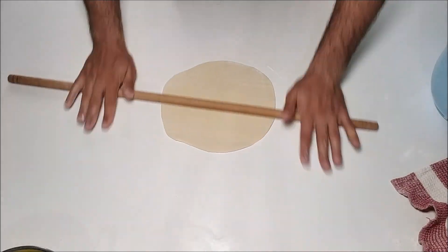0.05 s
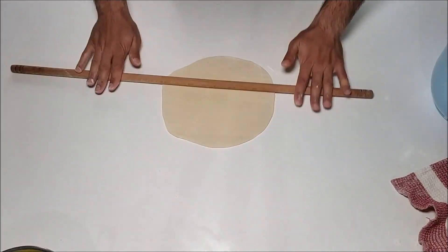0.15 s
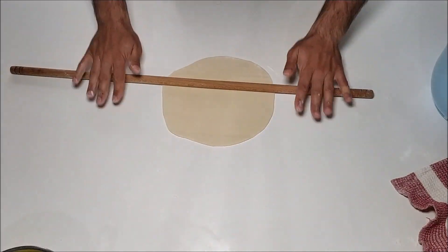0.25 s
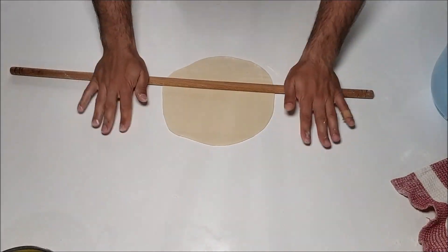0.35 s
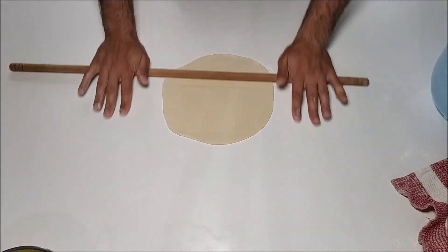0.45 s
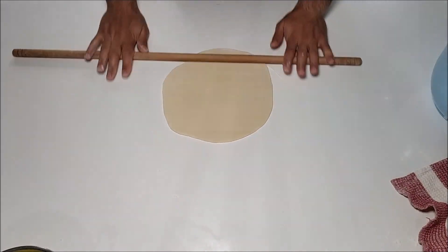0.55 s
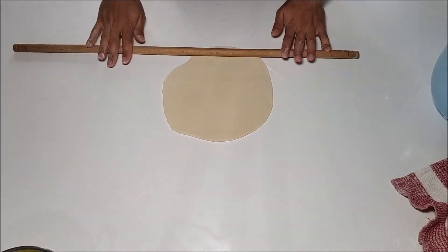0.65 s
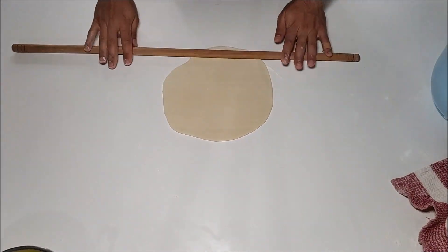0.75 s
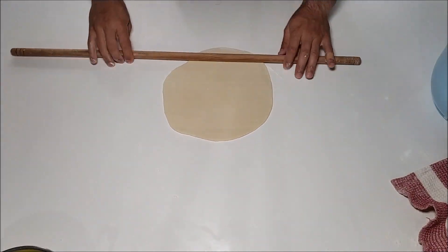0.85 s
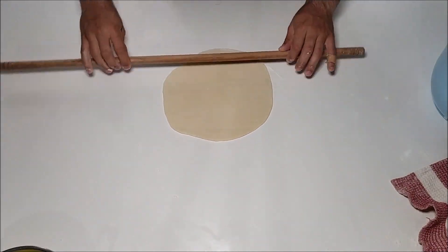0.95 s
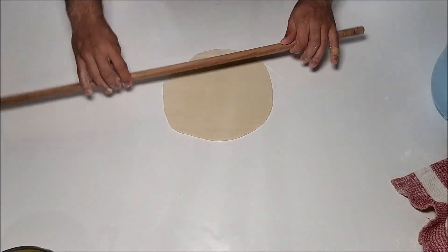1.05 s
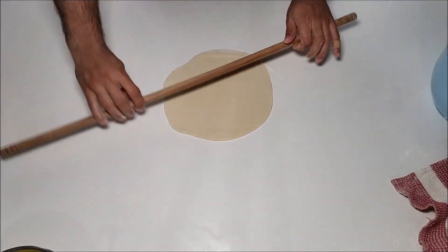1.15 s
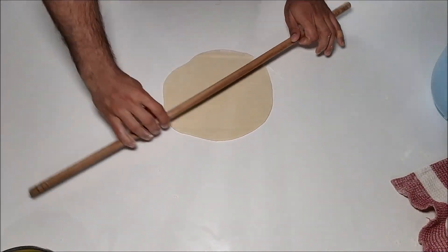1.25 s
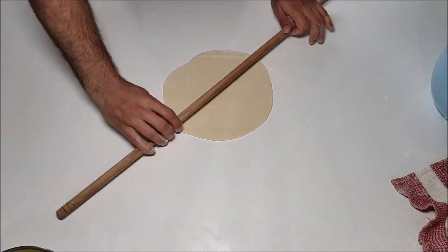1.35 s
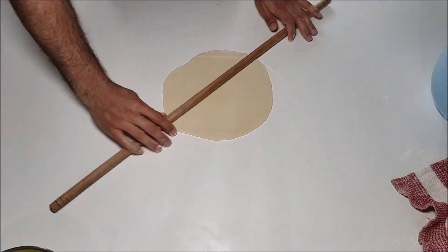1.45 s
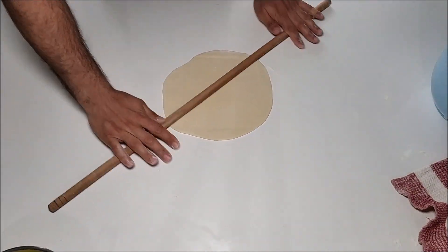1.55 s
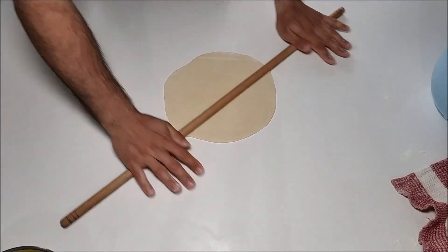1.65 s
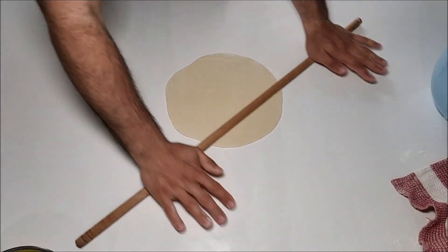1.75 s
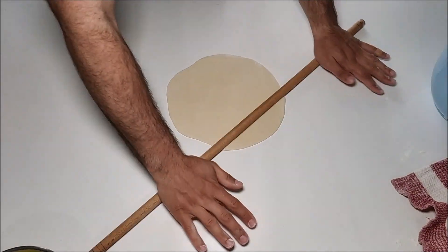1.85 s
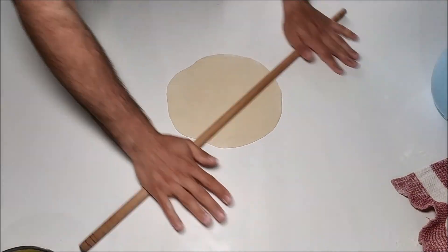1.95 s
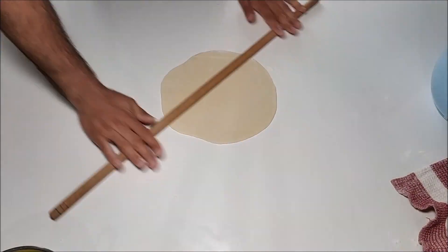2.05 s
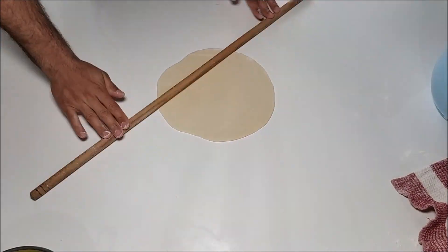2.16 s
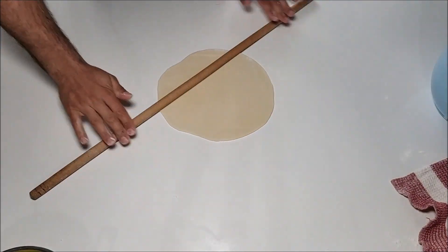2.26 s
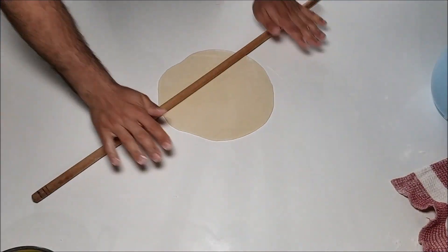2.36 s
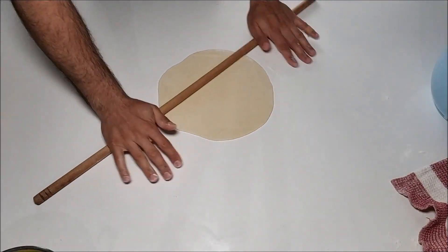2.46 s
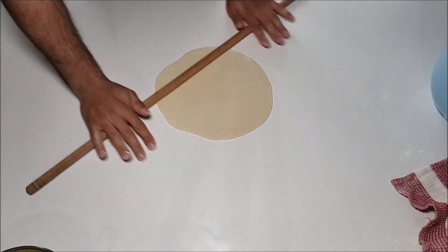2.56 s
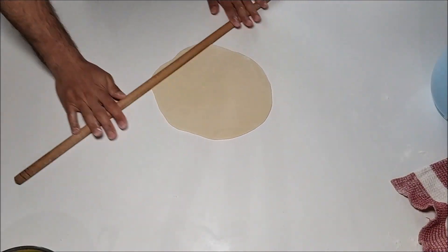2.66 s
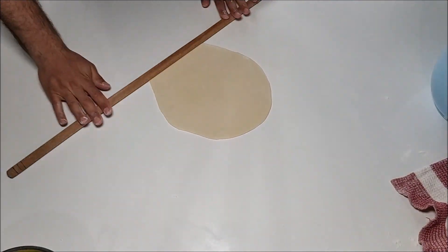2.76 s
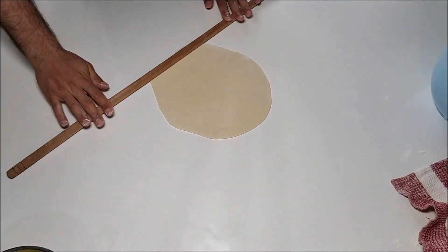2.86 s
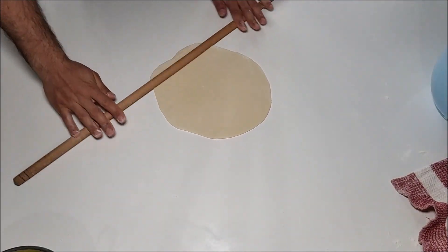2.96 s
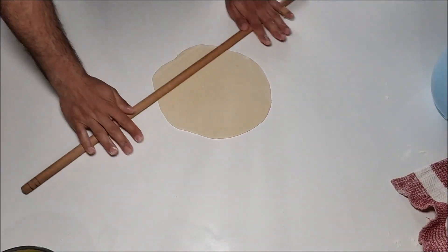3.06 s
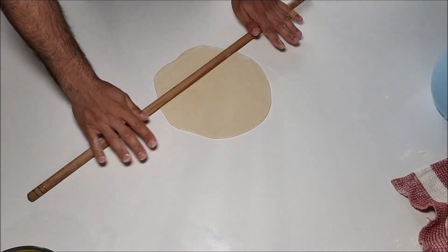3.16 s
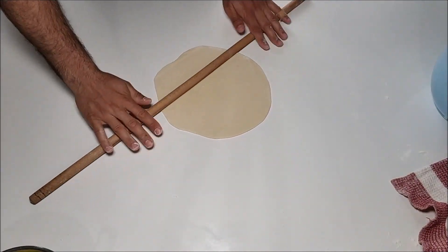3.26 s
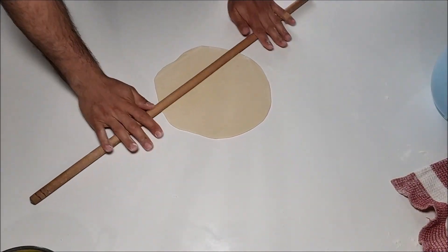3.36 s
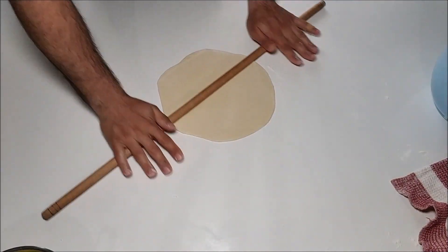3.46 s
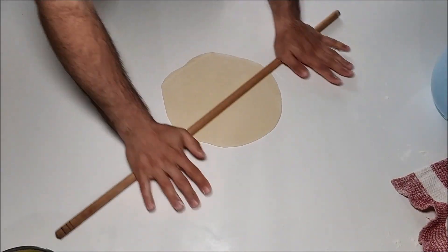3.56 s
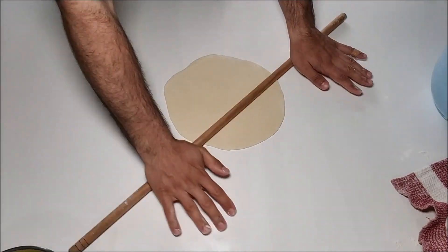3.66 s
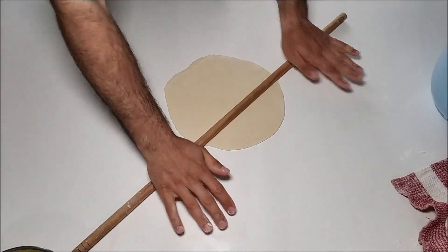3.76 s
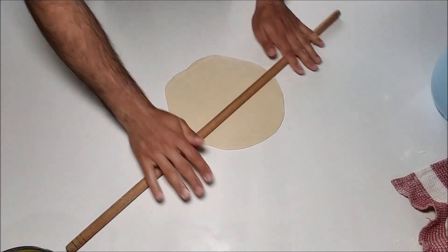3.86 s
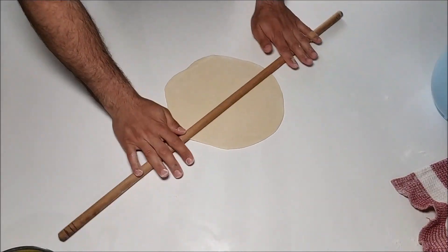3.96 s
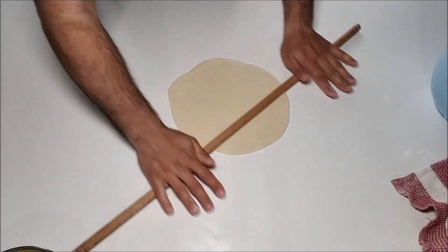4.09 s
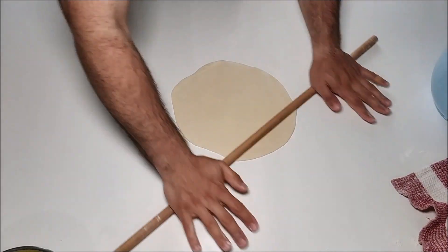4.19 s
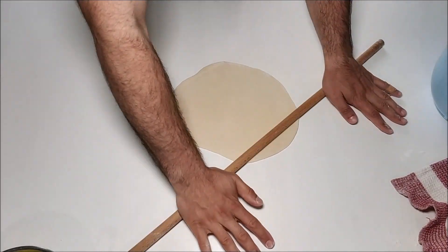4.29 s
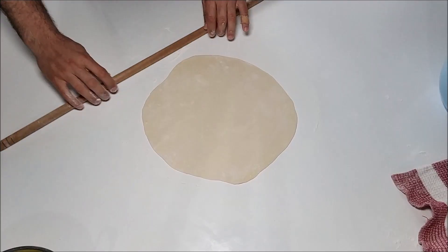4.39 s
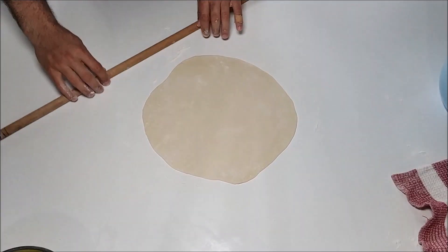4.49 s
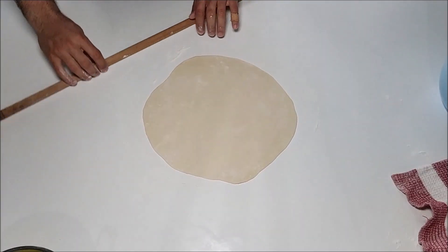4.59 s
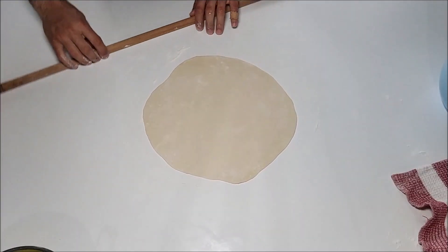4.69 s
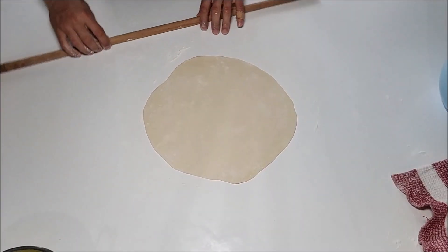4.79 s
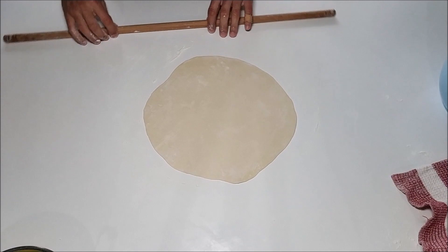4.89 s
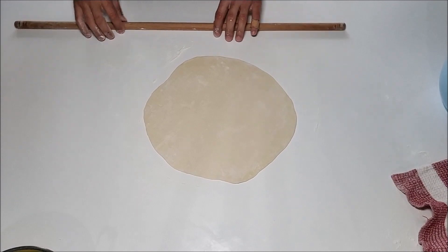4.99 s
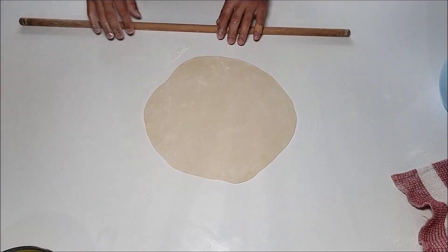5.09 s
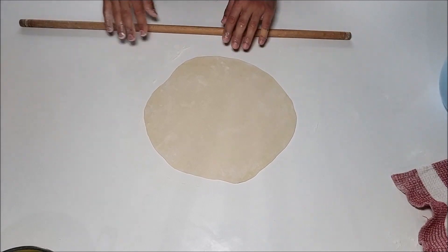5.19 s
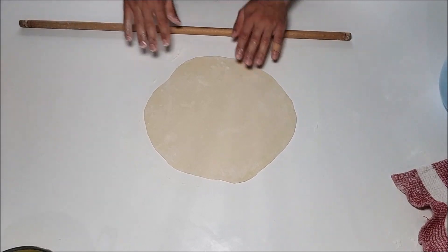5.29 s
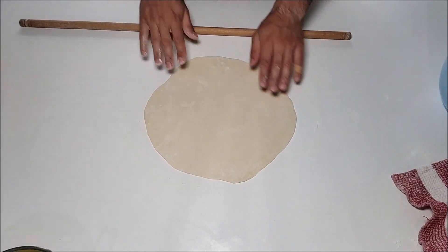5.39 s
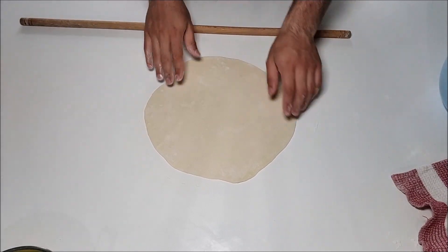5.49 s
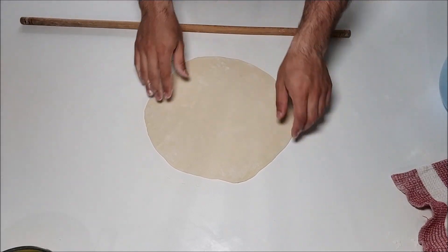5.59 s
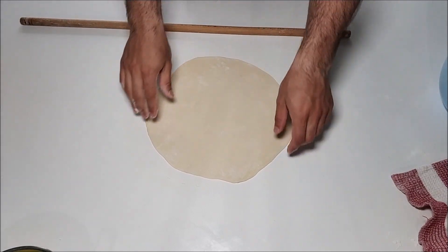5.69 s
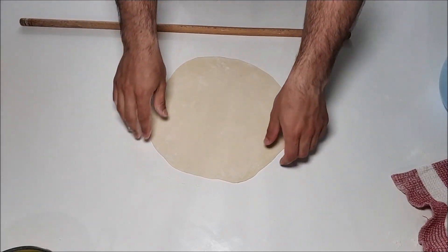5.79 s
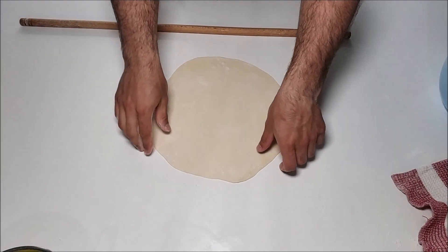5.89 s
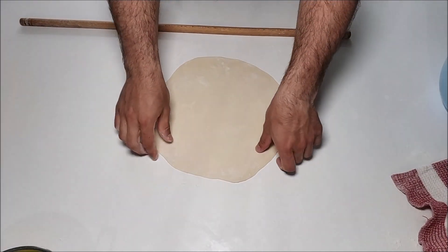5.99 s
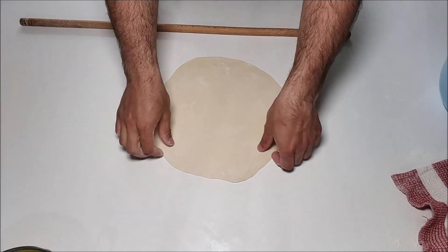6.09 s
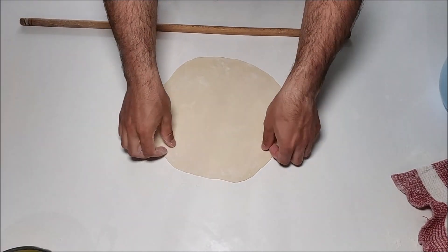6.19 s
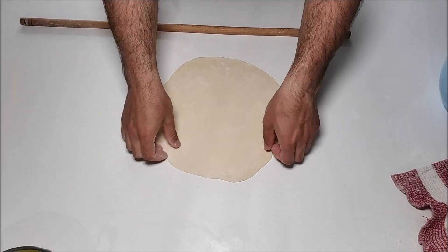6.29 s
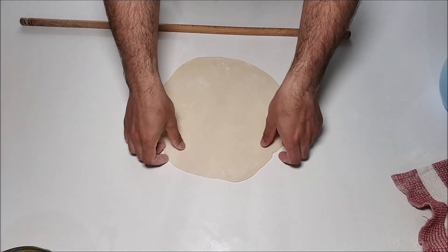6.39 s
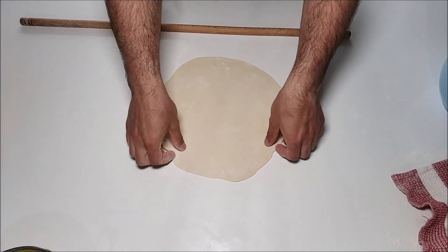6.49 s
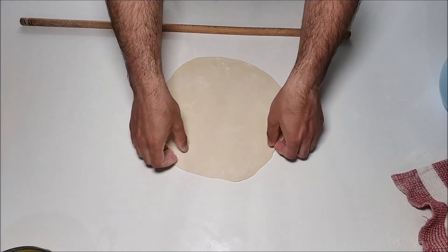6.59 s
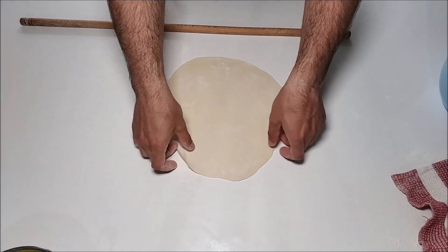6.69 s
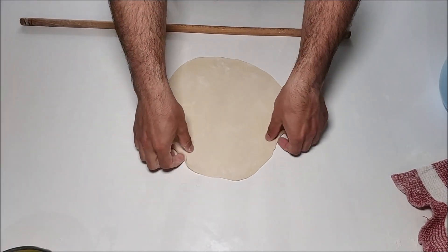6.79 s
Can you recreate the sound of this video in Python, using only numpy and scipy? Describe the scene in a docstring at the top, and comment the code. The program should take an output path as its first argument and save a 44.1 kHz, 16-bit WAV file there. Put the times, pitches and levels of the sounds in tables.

```python
"""A long thin wooden rolling pin rumbles back and forth over dough on a stone counter in a bare kitchen.
Flour crunches under it, palms hiss along the wood, and its ends clack on the counter as it tips off
the dough. Then it is laid aside and the hands ease the dough round with soft thuds and skids,
over a low appliance hum and a faint, wavering distant tone."""
import sys
import numpy as np
from scipy import signal
from scipy.fft import rfft, irfft
from scipy.io import wavfile

SR = 44100
rng = np.random.default_rng(int(sys.argv[2]) if len(sys.argv) > 2 else 0)


def unload_wav(signal):
    """Save mono or channel-first audio to the path in sys.argv[1] as 16-bit WAV at rate SR, clipped to [-1, 1]."""
    wavfile.write(
        sys.argv[1],
        SR,
        np.round(np.clip(np.atleast_2d(signal).T, -1, 1) * 32767).astype(np.int16),
    )


N = 301644

# Pushes and pulls: t/s, length/s, speed peak/fraction of length, rumble/dB, grit/dB, hiss/dB
PIN_STROKES = [(0.03, 0.33, 0.37, -42.5, -49.5, -54), (0.471, .16, 0.32, -72, -64, -58.5),
               (0.57, .23, 0.24, -44, -51, -54.5), (0.866, 1, 0.67, -61, -58.5, -69),
               (1.49, 0.47, 0.78, -50.5, -54, -59), (2.002, 0.37, 0.39, -42.5, -45, -53),
               (2.56, .3, 0.44, -49.5, -58, -55.5), (2.969, 0.29, .25, -55.5, -70.5, -64),
               (3.44, 0.41, 0.31, -50.5, -53, -55), (4.024, 0.38, 0.48, -49.5, -51.5, -55),
               (4.583, 0.33, 0.6, -57.5, -57.5, -60), (4.888, 0.22, 0.27, -52.5, -58, -60.5)]
def stroke_gains():
    """Rumble, grit and hiss each grow as a power of the pin's speed."""
    exponents = (1.37, 1.3, 0.3)
    gains = np.zeros((3, N))
    for start_s, length_s, peak, *levels_db in PIN_STROKES:
        for gain, db, exponent in zip(gains, levels_db, exponents):
            add(gain, start_s, amp(db) * hand_speed(length_s, peak) ** exponent)
    return gains


# Rumble spectrum: f/Hz, density/dB
RUMBLE_DB = [(50, -48), (90, -38), (130, -2.5), (200, -1), (290, -1.5), (380, 0.5), (480, -13), (800, -12),
             (2000, -26.5), (5000, -28.5), (8000, -61)]
# Flour crunch spectrum: f/Hz, density/dB
GRIT_DB = [(300, -25.5), (600, -3.5), (900, -4.5), (1600, -1.5), (2300, -6), (3500, -5.5), (6000, -11.5),
           (11000, -33.5)]
def rolling(rumble_gain, grit_gain):
    """Flats in the wood bump the counter as the pin turns; flour crunches under it."""
    turning = amp(1.5 * narrow_noise(30, width_hz=15))
    bumps = unit(colour(grains(1500, spread_db=1.9) * turning, RUMBLE_DB))
    rumble = kitchen(rumble_gain * bumps, wet_db=1, early_db=-22)
    crunch = unit(colour(grains(1500, spread_db=1.4) * turning, GRIT_DB))
    grit = kitchen(grit_gain * crunch, wet_db=3, early_db=-4.5)
    return amp(-6.5) * rumble + amp(-7.5) * grit


# Pin hits on the counter: t/s, level/dB, contact cut-off/Hz, thud/dB, crack/dB, ring/dB,
# low mode/Hz, high mode/Hz
PIN_HITS = [(0.892, -24.5, 4770, -17.5, -3.5, -1, 1122, 3040),
            (0.901, -29, 3600, -13.5, -21, 8, 1530, 3061), (1.473, -17, 5200, -15, -2, 5.5, 1800, 2490),
            (1.526, -19.5, 5360, -11.5, -1.5, 3, 1633, 3053), (1.538, -23, 4560, -24, -11, -19, 1480, 3900),
            (2.1451, -24.5, 3480, -12.5, 2, -5, 825, 2180), (2.527, -20.5, 4600, -10, 2, -3, 1938, 3390),
            (2.563, -26, 3000, -15, -12, -12, 788, 1936), (3.380, -21, 8300, -8, 8.5, -1.5, 2100, 5040),
            (3.390, -19, 5200, -14.5, 5.5, -3.5, 1890, 2270), (3.68, -38.5, 1690, -10, -16, -6, 1737, 1920),
            (3.9699, -21, 8050, -13.5, 8, 8.5, 3270, 3530),
            (3.983, -21, 2400, -30.5, -20.5, -8.5, 1580, 1970),
            (4.405, -22, 2230, -5.5, -14, -6, 354, 1584), (4.419, -22.5, 3600, -13, -1.5, -6.5, 2320, 3930),
            (4.444, -31, 2010, -6.5, -16, 11, 330, 1800), (4.598, -55.5, 1500, 14.5, -18, 18, 344, 1120)]
def knocks():
    """The pin's ends strike the counter."""
    out = np.zeros(N)
    for start_s, *blow in PIN_HITS:
        add(out, start_s, knock(*blow))
    return out


# Wood-on-stone clatter spectrum: f/Hz, density/dB
CLATTER_DB = [(100, -18), (300, -8), (580, -33), (800, -2), (1000, -6), (1700, 4.5), (3500, 0), (5000, -1),
              (7000, -4.5), (9300, 4.5), (11000, -32.5)]
# Counter thud spectrum: f/Hz, density/dB
THUD_DB = [(40, -22), (90, -46), (140, -3), (220, 2), (330, 2.5), (400, 2), (550, -5), (1200, -17),
           (5000, -63)]
# First-contact spectrum: f/Hz, density/dB
CRACK_DB = [(200, -25), (1000, -14.5), (2500, -2.5), (4000, 3), (7000, -7.5), (9300, -5.5), (11000, -11.5)]
def knock(db, contact_hz, thud_db, crack_db, ring_db, low_hz, high_hz):
    """One blow: crack, ring and clatter, dulled by a soft contact, over the counter's thud."""
    t = np.arange(SR * 3 // 4) / SR
    contact = signal.butter(2, contact_hz, fs=SR)
    clatter = amp(1) * burst(t, 0.03, CLATTER_DB)
    ring = amp(ring_db) * pin_ring(t, low_hz, high_hz)
    wood = one_blow(signal.lfilter(*contact, ring + clatter))
    thud = amp(thud_db) * burst(t, 0.057, THUD_DB)
    body = kitchen(wood + thud, wet_db=3)
    touch = one_blow(colour(signal.unit_impulse(len(t)), CRACK_DB))
    chatter = amp(-4) * burst(t, 0.0056, CRACK_DB)
    crack = one_blow(signal.lfilter(*contact, touch + chatter))
    crack = kitchen(crack, wet_db=-1.5, early_db=-32)
    return amp(db - 12) * (body + amp(crack_db - 2.5) * crack)


# Hand-damped pin modes: f/Hz, level/dB, t60/s
PIN_MODES = [(400, -16.5, 0.11), (694.7, -13.5, 0.16), (817, -10, 0.085), (1060, -3.5, 0.068),
             (1140, -12, 0.35), (1485, -7.5, 0.21), (1620, -10.5, 0.14), (1800, -32, 0.091),
             (1890, -3, 0.13), (2010, -15, 0.11), (2320, -4, 0.12), (2527, 2.5, 0.048), (2714, -6, 0.22),
             (3013, 8, 0.027), (3000, 2, 0.027), (3530, -7, 0.11), (3588, 8.5, 0.052), (3940, -6, 0.086),
             (4430, 4, 0.021), (4260, -12.5, 0.12), (4643, -26.5, .06), (4873, -3.5, 0.12),
             (5200, 1.5, .05)]
def pin_ring(t, low_hz, high_hz):
    """The landing spot weights the pin's modes and favours two more; the grip detunes them slightly."""
    favoured_db, favoured_t60_s, spread_db = 6, 0.075, 2
    modes = [*PIN_MODES, (low_hz, favoured_db, favoured_t60_s), (high_hz, favoured_db, favoured_t60_s)]
    hz, db, t60_s = np.transpose(modes)[:, :, None]
    weight, grip, phase = rng.standard_normal((3, len(modes), 1))
    waves = np.sin(2 * np.pi * (hz * (1 + 0.003 * grip) * t + phase))
    decays = amp(db + spread_db * weight - 60 * t / t60_s)
    return one_blow((decays * waves).sum(0))


# Palm skids: t/s, length/s, level/dB
PALM_SKIDS = [(0.1, .07, -52), (0.635, 0.079, -42), (0.959, 0.075, -54), (1.071, .085, -51.5),
              (1.182, 0.051, -59.5), (1.846, 0.051, -51), (2.594, 0.18, -38), (2.747, 0.066, -45),
              (3.127, 0.09, -55.5), (4.586, 0.12, -55), (4.78, 0.11, -55.5), (5.67, 0.18, -67),
              (6.058, 0.45, -70), (6.55, 0.14, -68)]
# Skin friction spectrum: f/Hz, density/dB
RUB_DB = [(400, -25), (1200, -16.5), (2500, -11.5), (4500, -8.5), (6000, -8.5), (7500, -7.5), (8900, 3.5),
          (9600, 1), (11000, -19)]
def rubbing(hiss_gain):
    """Skin slips over floury wood and dough in tiny catches; each skid adds a short swell."""
    skid_gain = np.zeros(N)
    for start_s, length_s, db in PALM_SKIDS:
        add(skid_gain, start_s, amp(db) * hand_speed(length_s, peak=0.54) ** 0.68)
    slips = grains(9000, spread_db=2) * amp(0.7 * narrow_noise(40, width_hz=30))
    hiss = np.hypot(hiss_gain, skid_gain) * unit(colour(slips, RUB_DB))
    return amp(-4.5) * kitchen(hiss, wet_db=2, early_db=-1.5)


# Soft thuds on dough and counter: t/s, level/dB
SOFT_THUDS = [(1.36, -58), (2.045, -45.5), (5.215, -54), (5.256, -59), (5.599, -55), (5.823, -54),
              (6.141, -62), (6.395, -51.5), (6.629, -58.5), (6.775, -50.5)]
def soft_thuds():
    """The hands or a light bump of the pin wake only the counter's low thud."""
    attack_s, t60_s = 0.008, 0.1
    t = np.arange(SR // 2) / SR
    out = np.zeros(N)
    for start_s, db in SOFT_THUDS:
        thud = burst(t, t60_s, THUD_DB) * (1 - np.exp(-t / attack_s))
        add(out, start_s, amp(db - 7.5) * one_blow(thud))
    return kitchen(out, wet_db=-4)


# Air noise spectrum: f/Hz, density/dB
AIR_DB = [(18, -89), (30, -36.5), (65, -53.5), (103, -39), (117, -31), (132, -5.5), (169, -11.5),
          (206, -1.5), (355, -10.5), (501, -9), (907, -16), (1080, -11.5), (7230, -24), (9250, -20),
          (11000, -39), (14300, -65), (22000, -120)]
# Low appliance hum, then distant tone: f/Hz, width/Hz, level/dB
TONE_BANDS = [(215.8, 7.2, -11.5), (569, 67, -19.5)]
# Room tone envelope: t/s, level/dB
ROOM_TONE_DB = [(0, -55.5), (.85, -60), (1.45, -65.5), (2.5, -61), (3.9, -62), (5.1, -56.5), (6.84, -55)]
def room_tone():
    """Air noise, a low appliance hum and a faint, wavering distant tone; the level dips mid-scene."""
    air = amp(-4) * unit(colour(rng.standard_normal(N), AIR_DB))
    tones = sum(amp(db) * narrow_noise(hz, width_hz) for hz, width_hz, db in TONE_BANDS)
    level_db = np.interp(np.arange(N) / SR, *np.transpose(ROOM_TONE_DB))
    return amp(level_db) * (air + tones)


# Room decay: f/Hz, t60/s
ROOM_T60_S = [(150, 0.6), (400, 0.44), (1000, 0.39), (2800, 0.4), (5000, 0.31), (9000, 0.26)]
def kitchen(x, wet_db, early_db=-9, build_s=0.0018):
    """Adds four reflections off nearby surfaces and an echo that dies band by band."""
    t = np.arange(SR * 3 // 4) / SR
    scatter = grains(5000, spread_db=1.8)[:len(t)]
    hz, frame_s, bands = signal.stft(scatter, SR, nperseg=256)
    decay = amp(-60 * frame_s / at_hz(ROOM_T60_S, hz)[:, None])
    tail = signal.istft(bands * decay, SR, nperseg=256)[1][:len(t)]
    tail *= 1 - np.exp(-t / build_s)
    echo = amp(wet_db) * tail / np.linalg.norm(tail)
    echo[rng.integers(40, 260, 4)] += amp(early_db)
    return x + signal.fftconvolve(x, echo)[:len(x)]


def hand_speed(length_s, peak):
    """Even acceleration from rest, then even braking."""
    progress = np.arange(0, length_s, 1 / SR) / length_s
    return np.interp(progress, [0, peak, 1], [0, 1, 0])


def grains(per_s, spread_db):
    """Random tiny impacts of uneven size, rms 1."""
    size = amp(spread_db * np.minimum(rng.exponential(1, N), 4))
    return unit(size * rng.standard_normal(N) * (rng.random(N) < per_s / SR))


def burst(t, t60_s, spectrum):
    """Dense, dying rattle."""
    return one_blow(colour(rng.standard_normal(len(t)) * amp(-60 * t / t60_s), spectrum))


def narrow_noise(hz, width_hz):
    """Noise band around hz, rms 1."""
    offset_hz = np.fft.rfftfreq(N, 1 / SR) - hz
    band = rfft(rng.standard_normal(N)) / (1 + (2 * offset_hz / width_hz) ** 2)
    return unit(irfft(band, N))


def colour(x, spectrum, size=4096):
    """Minimum-phase filter with the given spectrum."""
    hz = abs(np.fft.fftfreq(size, 1 / SR))
    log_gain = np.log(amp(at_hz(spectrum, hz)))
    taps = np.fft.ifft(np.exp(np.conj(signal.hilbert(log_gain)))).real
    return signal.oaconvolve(x, taps[:size // 2])[:len(x)]


def at_hz(table, hz):
    """Table lookup on a log-frequency axis."""
    table_hz, values = np.transpose(table)
    return np.interp(np.log(hz + 1), np.log(table_hz + 1), values)


def amp(db):
    """Decibels to gain."""
    return 10 ** (np.asarray(db) / 20)


def unit(x):
    """Scales to rms 1."""
    return x / np.sqrt(np.mean(x ** 2) + 1e-20)


def one_blow(x):
    """Scales to the energy of 20 ms at rms 1."""
    return x / np.linalg.norm(x) * np.sqrt(SR / 50)


def add(mix, start_s, sound):
    """Mixes a sound in at start_s."""
    part = mix[round(start_s * SR):][:len(sound)]
    part += sound[:len(part)]


def scene():
    """All sources at one microphone above the counter."""
    rumble_gain, grit_gain, hiss_gain = stroke_gains()
    mix = knocks() + rolling(rumble_gain, grit_gain) + rubbing(hiss_gain) + soft_thuds() + room_tone()
    return mix[None]


def record(dry, low_cut_hz=105, band_limit_hz=10550):
    """Microphone bass cut, then band limit."""
    highpass = signal.butter(3, low_cut_hz, "high", fs=SR, output="sos")
    lowpass = signal.firwin(101, band_limit_hz, window=("kaiser", 7), fs=SR)
    return signal.oaconvolve(signal.sosfilt(highpass, dry), lowpass[None], "same")


dry = scene()
out = record(dry)
unload_wav(out)
```